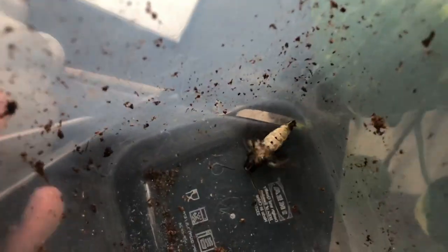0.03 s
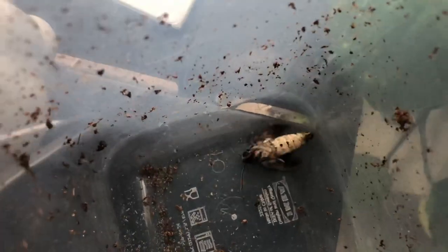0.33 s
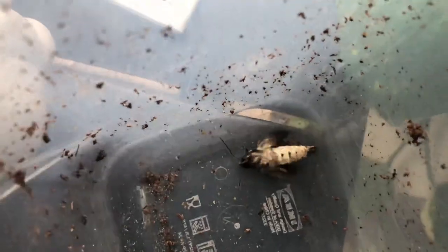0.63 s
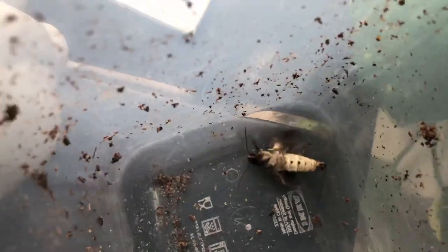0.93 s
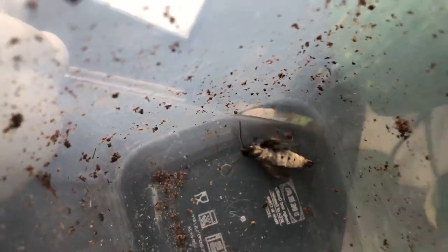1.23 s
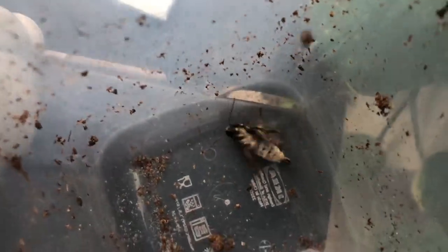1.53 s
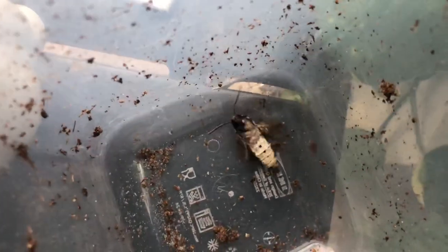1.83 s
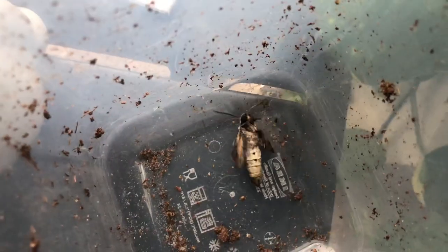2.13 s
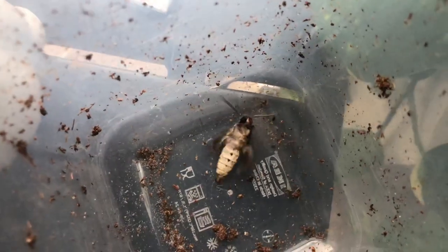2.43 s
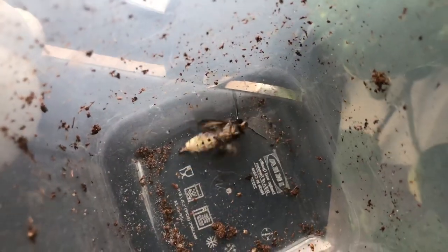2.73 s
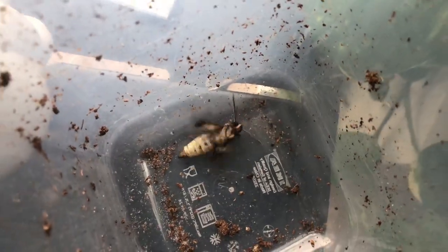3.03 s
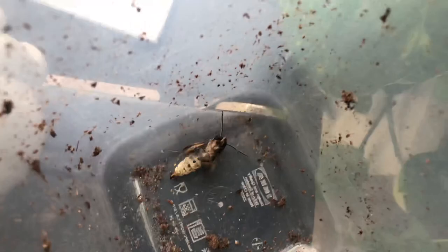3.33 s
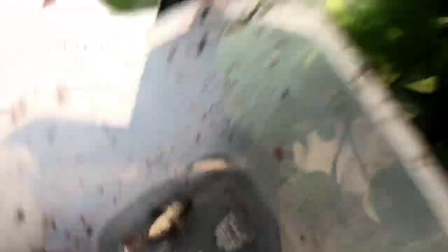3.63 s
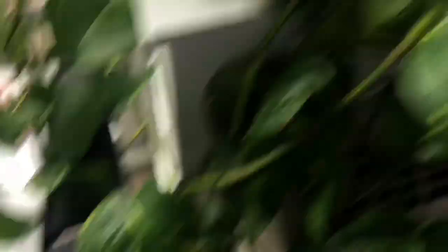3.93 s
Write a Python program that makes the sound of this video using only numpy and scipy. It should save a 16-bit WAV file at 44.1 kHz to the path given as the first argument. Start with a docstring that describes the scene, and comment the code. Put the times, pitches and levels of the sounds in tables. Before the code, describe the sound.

A large moth beats its wings inside a thin plastic tub, with rapid hollow thuds.

```python
"""Close by, indoors, over a low hum, a large moth beats its wings in a thin plastic tub.
About fourteen times a second a beat thuds on the tub's floor; in between, the wings tick and rustle
over plastic and crumbs of soil, and the legs scrabble faintly. In the first half second the tub takes
two deeper knocks. The hum sinks away after a second, the beats hit hardest between two and three
seconds, and near the end the fluttering weakens."""
import sys
import numpy as np
from scipy import signal
from scipy.fft import irfft
from scipy.io import wavfile
from scipy.ndimage import uniform_filter1d

SR = 44100
rng = np.random.default_rng(int(sys.argv[2]) if len(sys.argv) > 2 else 0)


def unload_audio(sound):
    """Save the sound as a 16-bit wav file, at the path given as the first command line argument."""
    columns = np.transpose(np.atleast_2d(sound))
    # keep every value between -1 and 1, then stretch to whole-number steps
    steps = np.round(np.clip(columns, -1, 1) * 32767)
    wavfile.write(sys.argv[1], SR, steps.astype(np.int16))


N = 4 * SR
TOP_HZ = 16100
LEAD_S = .0017  # thuds start this far ahead of their cue, scratches half as far


def amp(db):
    return 10 ** (np.asarray(db) / 20)


def unit_rms(x):
    return x / np.sqrt(np.mean(x ** 2) + 1e-20)


def curve_at(points, hz):
    """A curve joined by straight lines over log frequency."""
    f, value = np.transpose(points)
    return np.interp(np.log(hz + 1), np.log(f), value)


def fader(points):
    """A dB curve over time as a gain per sample."""
    return amp(np.interp(np.arange(N) / SR, *np.transpose(points)))


def add(mix, s, sound):
    part = mix[max(round(s * SR), 0):][:len(sound)]
    part += sound[:len(part)]


def minimum_phase(db):
    """The spectrum of the tightest impulse that has these gains."""
    log_gain = np.log(amp(np.r_[db, db[-2:0:-1]]))
    return np.exp(np.conj(signal.hilbert(log_gain)))[:len(db)]


def eq(x, points, size=2048):
    """Filters x by a dB curve over frequency."""
    db = curve_at(points, np.fft.rfftfreq(size, 1 / SR))
    return signal.oaconvolve(x, irfft(minimum_phase(db)))[:len(x)]


# Tone of the quiet room (frequency [Hz], gain [dB])
AIR_EQ = [(25, -49), (55, 2), (90, -1.5), (170, 7.5), (280, 1), (500, 1.5), (1100, -14), (16000, -40)]
# Fader ride of the hum (time [s], level [dB])
HUM_RIDE = [(0, -51), (.2, -50), (.32, -55), (.46, -45), (.67, -59), (.82, -47.5), (1.08, -50.5),
            (1.25, -59.5), (4, -67)]
def room_tone(air_db=-54, hum_hz=60.7, third_db=-6):
    """A bed of dark, steady air and a low hum with its third harmonic."""
    phase = 2 * np.pi * (hum_hz * np.arange(N) / SR + rng.random())
    hum = np.sin(phase) + amp(third_db) * np.sin(3 * phase)
    air = unit_rms(eq(rng.standard_normal(N), AIR_EQ, size=8192))
    return amp(air_db) * air + fader(HUM_RIDE) * hum


# Decay of the room (frequency [Hz], T60 [s])
ROOM_DECAY = [(500, 0.58), (3000, 0.05)]
def reverb(x, predelay_s=.008):
    """The room's short diffuse tail, its highs dying first."""
    hz, t, noise = signal.stft(rng.standard_normal(SR // 2), SR, nperseg=256)
    decay = np.exp(-np.log(1000) * t / curve_at(ROOM_DECAY, hz)[:, None])
    tail = signal.istft(noise * decay, SR, nperseg=256)[1]
    out = np.zeros(N)
    add(out, predelay_s, signal.fftconvolve(x, tail / np.linalg.norm(tail)))
    return out


# Low modes of the whole tub (frequency [Hz], gain [dB], T60 [s])
KNOCK_MODES = [(210.5, 4.9, 0.12), (190.6, 2, 0.1), (543, 5.6, 0.041)]
# Cues of the deeper knocks (time [s], level [dB])
KNOCK_CUES = [(.158, -31.5), (.417, -18.5)]
def knocks(attack_s=.011):
    """Soft, heavier bumps ring the low modes of the whole tub."""
    out, t = np.zeros(N), np.arange(SR // 2) / SR
    ring = sum(amp(db) * np.exp(-np.log(1000) * t / t60) * np.sin(2 * np.pi * hz * t)
               for hz, db, t60 in KNOCK_MODES)
    for s, db in KNOCK_CUES:
        add(out, s, amp(db) * ring * (1 - np.exp(-t / attack_s)))
    return out


# The tub's resonances and the gaps between them (frequency [Hz], width [Hz], gain [dB])
TUB_MODES = [(183, 67.5, 21), (412.1, 22, 4.5), (1300, 120, -3.5), (1452, 230, 15), (2248, 160, 7),
             (2506, 142, -10.5), (2796, 388, 16), (3540, 70, -7), (3610, 250, 10)]
def resonances(hz):
    """Boost or cut in dB that the tub's modes give each frequency."""
    return sum(db / (1 + (2 * (hz - f) / width) ** 2) for f, width, db in TUB_MODES)


def hollow(x, depth=.36):
    """Friction on the plastic takes on part of the tub's ring."""
    hz = np.arange(1, TOP_HZ, 10)
    return eq(x, np.c_[hz, depth * resonances(hz)])


# Body of the tub under a blow (frequency [Hz], gain [dB])
SHELL_EQ = [(40, -75.5), (125, -34), (260, -28.5), (350, -13), (440, 3), (550, 2), (750, -17.5),
            (1080, -28.5), (1280, -38.5), (2000, -37), (4200, -49.5), (16000, -58)]
# Bands that slow bending waves hold back (frequency [Hz], width [ratio])
BENDS = [(185, .55), (520, 1.2), (2900, .6)]
# Returns from the rim and nearby surfaces (delay [s], gain [ratio])
ECHOES = [(.0097, 0.24), (0.0202, 0.052), (.038, 0.11)]
NEUTRAL_BRIGHT_DB = -22.5  # brightness that leaves the treble shelf flat
def thud(bright_db, place_db, shelf_hz=1470, colour_db=1.9, size=8192):
    """One blow, peak 1: a tick bending down into the tub's low note, coloured by the spot struck."""
    hz = np.fft.rfftfreq(size, 1 / SR)
    treble = 1 - 1 / (1 + (hz / shelf_hz) ** 4)
    spot_colour = curve_at(np.c_[np.geomspace(100, TOP_HZ, 40), rng.standard_normal(40)], hz)
    # The moth's position lifts the lows and a comb of bands from 1500 Hz up.
    comb = -np.cos(np.pi * hz / 1500) * (hz > 750) + (hz < 260)
    db = curve_at(SHELL_EQ, hz) + resonances(hz) + treble * (bright_db - NEUTRAL_BRIGHT_DB)
    db += place_db * comb + colour_db * spot_colour * (1 + treble) / 2
    lag = np.prod([1 - (hz / f) ** 2 + 1j * width * hz / f for f, width in BENDS], axis=0)
    dispersion = (np.conj(lag) / lag) ** 2
    echoes = sum(gain * np.exp(-2j * np.pi * hz * s * rng.normal(1, .025)) for s, gain in ECHOES)
    echoes *= np.exp(-(hz / 1180) ** 2)  # only the low note returns
    wave = irfft(minimum_phase(db) * dispersion * (1 + echoes))[:size // 2]
    return wave / abs(wave).max()


# Tone of wing friction (frequency [Hz], gain [dB])
WING_EQ = [(300, -30), (1500, -19), (2900, -6), (4300, -5), (6000, -8), (9500, -8.5), (12000, -5),
           (15500, -7)]
# Fader ride of the rustle and the legs (time [s], level [dB])
RUSTLE_RIDE = [(0, -59), (1.2, -57.5), (2.8, -60), (3.5, -63), (4, -66.5)]
def rustle(trim_db=-.5, hiss_db=-6, rasps_per_s=150, rasp_s=.0023, grains_per_s=12000):
    """Little rasps of wing on plastic, sharp in attack and quick to die, over a faint grainy hiss."""
    onsets = rng.random(N) < rasps_per_s / SR
    accents = amp(4.5 * np.minimum(rng.exponential(1, N), 2))  # up to 9 dB
    rasps = signal.lfilter([1], [1, -np.exp(-1 / (SR * rasp_s))], onsets * accents)
    grains = rng.standard_normal(N) * (rng.random(N) < grains_per_s / SR)
    friction = eq(grains * np.hypot(rasps, amp(hiss_db)), WING_EQ)
    return amp(trim_db) * fader(RUSTLE_RIDE) * unit_rms(friction)


def legs(taps_per_s=16, trim_db=19):
    """Faint, irregular taps of the scrabbling legs, riding the rustle's fader."""
    out = np.zeros(N)
    for when, strength in rng.random((round(taps_per_s * N / SR), 2)):
        add(out, when * N / SR, strength * thud(bright_db=-17, place_db=rng.normal()))
    return amp(trim_db) * fader(RUSTLE_RIDE) * out


def scratches(cues, trim_db, decay_s, attack_s=.00035, roughness=.27, size=2048):
    """A short burst of uneven friction grains on each cue."""
    out, t = np.zeros(N), np.arange(size) / SR
    envelope = (1 - np.exp(-t / attack_s)) * np.exp(-t / decay_s)
    for s, db in cues:
        noise = rng.standard_normal(size)
        grain_gain = np.exp(roughness * np.repeat(rng.standard_normal(size // 16), 16))
        add(out, s - LEAD_S / 2, amp(db + trim_db) * unit_rms(noise * grain_gain) * envelope)
    return out


# Cues of the sharp ticks (time [s], level [dB])
TICK_CUES = [(2.244, -31), (2.3735, -27), (2.7736, -33), (2.928, -25.5), (3.214, -30.5), (3.488, -26),
             (3.685, -38)]
# Their crisp top end (frequency [Hz], gain [dB])
TICK_EQ = [(2500, -2), (8000, -6), (15000, 6)]
def ticks():
    """A claw or a crumb clicks on the plastic."""
    return eq(scratches(TICK_CUES, trim_db=-5.5, decay_s=.0016), TICK_EQ)


def flicker(x, depth_db=4.5):
    """The colour shifts from moment to moment in random bright and dull patches."""
    bands = signal.stft(x, nperseg=256)[2]
    patches = uniform_filter1d(rng.standard_normal(bands.shape), size=20, axis=0)  # across frequency
    patches = uniform_filter1d(patches, size=5, axis=1)  # across time
    return signal.istft(bands * amp(depth_db * unit_rms(patches)), nperseg=256)[1][:N]


# Cues of the wing tips (time [s], level [dB])
FLICK_CUES = [(0.0503, -26.5), (0.177, -29), (0.3448, -32), (0.4918, -17.5), (0.5655, -25), (0.7695, -27),
              (1.094, -20), (1.5295, -19.5), (1.6857, -26.5), (1.8624, -23), (2.169, -25.5), (2.307, -26.5),
              (2.644, -36), (2.6695, -24), (2.8524, -29), (3.352, -29)]
def flicks():
    """The wing tips flick the wall of the tub."""
    return eq(scratches(FLICK_CUES, trim_db=-5, decay_s=.0022), WING_EQ)


# Tone of the wing's snap (frequency [Hz], gain [dB])
SNAP_EQ = [(800, 1), (2900, 1), (6000, -7), (15000, -13)]
def snaps(beats, follow=.52):
    """The wing's own dry snap on contact: harder, brighter beats snap more."""
    cues = [(s, db + follow * (bright_db - NEUTRAL_BRIGHT_DB)) for s, db, bright_db in beats]
    return eq(scratches(cues, trim_db=-25.5, decay_s=.0035), SNAP_EQ)


# Lift of the tub's resonances as the moth turns about on the floor (time [s], gain [dB])
PLACE_RIDE = [(.5, 2), (.9, 3.5), (1.4, 3), (2.3, 0), (3.3, -1)]
# Cues of the wing beats (time [s], level [dB], brightness [dB])
BEAT_CUES = [(0.02, -16, -20), (0.099, -16.5, -17.5), (0.191, -17, -19.5), (0.263, -20, -22),
             (0.351, -14.5, -19.5), (0.366, -19, -34), (0.413, -19, -19), (0.502, -15, -17.5),
             (0.576, -12.5, -19), (0.627, -21, -20), (0.703, -19.5, -25), (0.782, -15, -23),
             (0.849, -13.5, -22.5), (0.91, -18, -20.5), (1.008, -12.5, -16.5), (1.059, -18.5, -23.5),
             (1.135, -13.5, -31), (1.2, -16.5, -23.5), (1.276, -17.5, -13), (1.353, -20, -13.5),
             (1.422, -15.5, -27), (1.481, -20.5, -22), (1.553, -23, -27), (1.645, -12.5, -15.5),
             (1.697, -16.5, -25), (1.772, -12.5, -14.5), (1.838, -15, -15.5), (1.887, -16, -18.5),
             (1.979, -10, -13.5), (2.05, -12.5, -31), (2.101, -14.5, -15), (2.189, -12, -23),
             (2.28, -10, -17.5), (2.319, -13.5, -14.5), (2.389, -21.5, -18), (2.413, -29.5, -8),
             (2.464, -10.5, -16.5), (2.535, -23.5, -36), (2.573, -21, -49), (2.605, -28, -18),
             (2.672, -25, -11), (2.715, -13, -29), (2.802, -10.5, -16), (2.868, -10, -23.5),
             (2.938, -15.5, -35), (3.009, -13, -26.5), (3.095, -12.5, -22), (3.167, -12.5, -21),
             (3.218, -23.5, -26), (3.293, -15, -19), (3.376, -13, -28.5), (3.441, -13, -34),
             (3.5, -18.5, -17), (3.578, -19.5, -28.5), (3.647, -28, -12), (3.706, -21.5, -25.5),
             (3.771, -25, -16), (3.835, -26.5, -14.5), (3.899, -28, -26), (3.967, -28.5, -17.5)]
def wing_beats(trim_db=-1.5, brush_db=-42, brush_spread_db=4, brush_after_s=(.022, .031)):
    """Each beat strikes the tub's floor where the moth lies, then brushes it lightly as the wing lifts."""
    out = np.zeros(N)
    for s, db, bright_db in BEAT_CUES:
        place_db = np.interp(s, *np.transpose(PLACE_RIDE))
        add(out, s - LEAD_S, amp(db + trim_db) * thud(bright_db, place_db))
        brush_gain = amp(rng.normal(brush_db, brush_spread_db) - place_db)
        add(out, s + rng.uniform(*brush_after_s), brush_gain * thud(bright_db=-7.5, place_db=place_db))
    return out


def scene(reverb_db=-25.5):
    """The moth up front in mono, with a touch of reverb, over the room tone."""
    thuds = wing_beats()
    friction = hollow(flicker(snaps(BEAT_CUES) + flicks() + rustle()))
    moth = thuds + friction + ticks() + knocks() + legs()
    return (moth + amp(reverb_db) * reverb(moth) + room_tone())[None]


def record(dry):
    """A steep high cut on the whole mix."""
    high_cut = signal.firwin(511, TOP_HZ, window=("kaiser", 9), fs=SR)
    return signal.oaconvolve(dry, high_cut[None], "same")


dry = scene()
out = record(dry)
unload_audio(out)
```